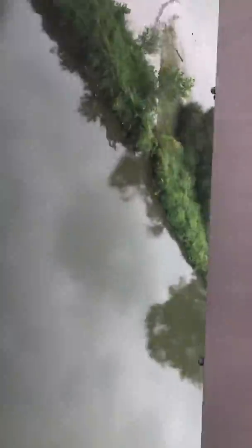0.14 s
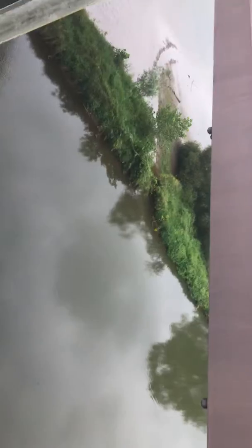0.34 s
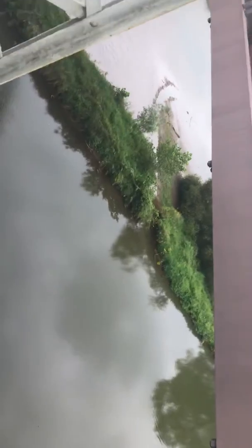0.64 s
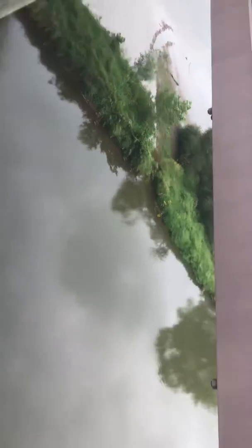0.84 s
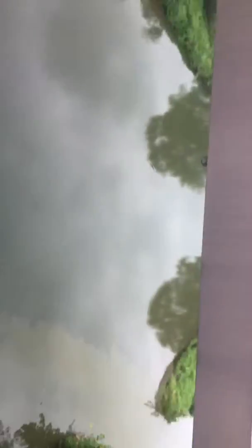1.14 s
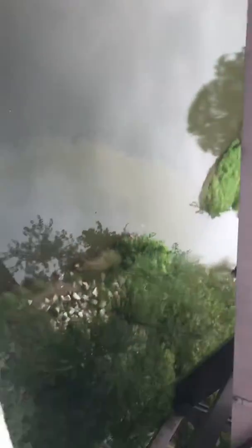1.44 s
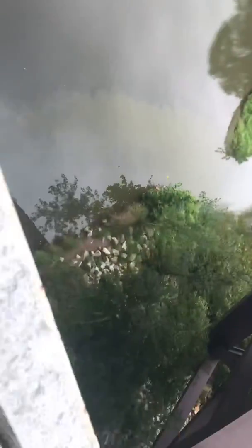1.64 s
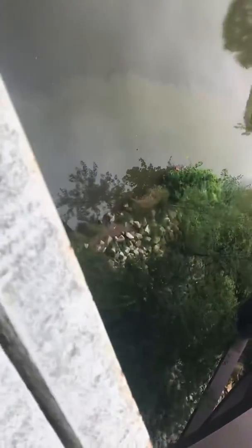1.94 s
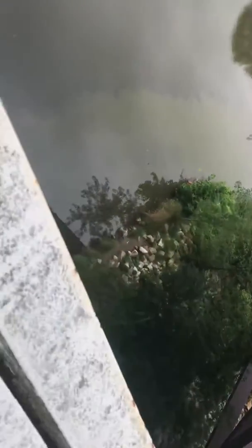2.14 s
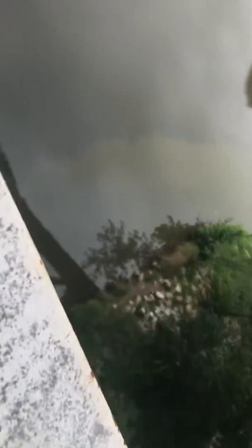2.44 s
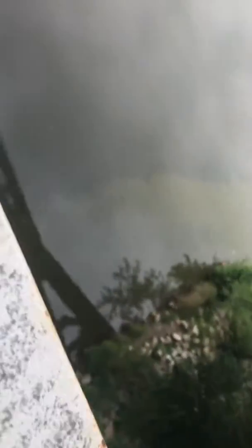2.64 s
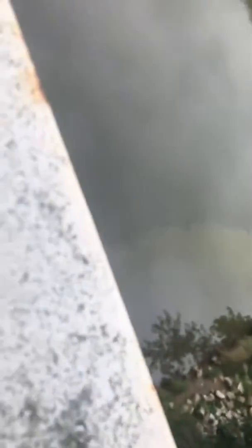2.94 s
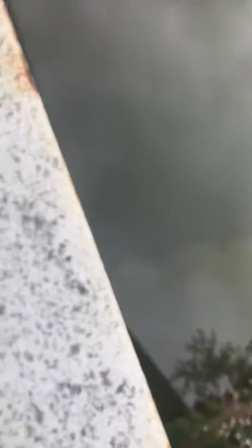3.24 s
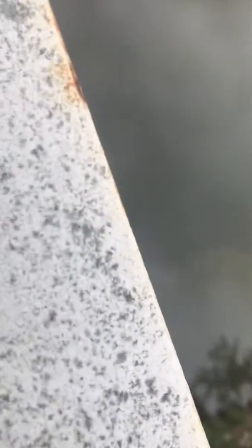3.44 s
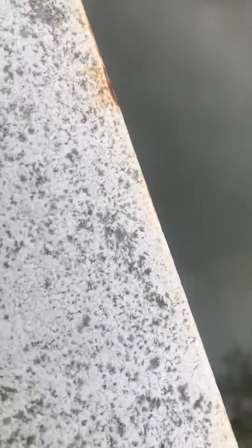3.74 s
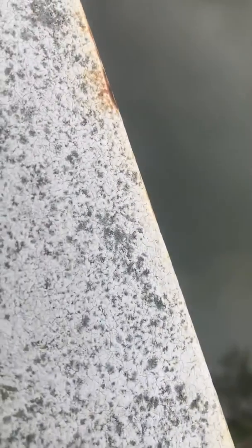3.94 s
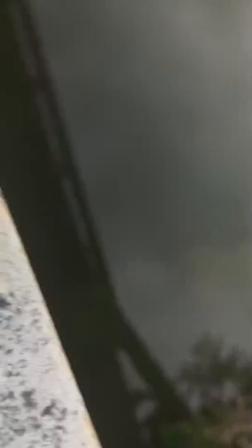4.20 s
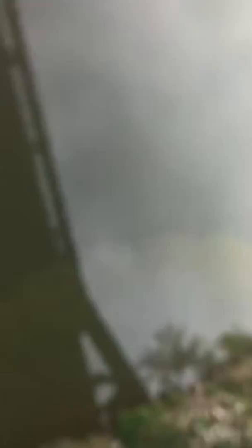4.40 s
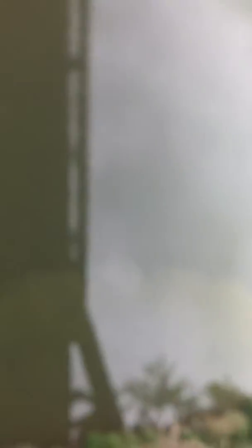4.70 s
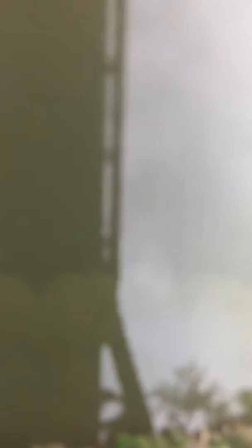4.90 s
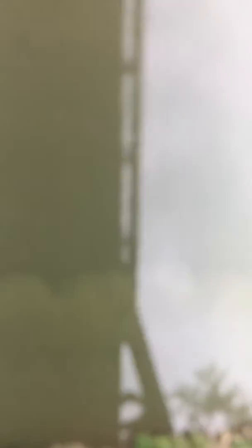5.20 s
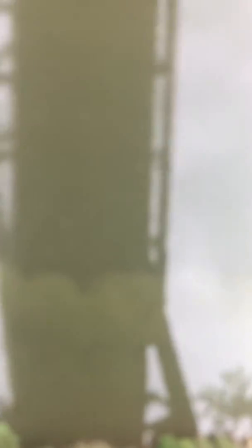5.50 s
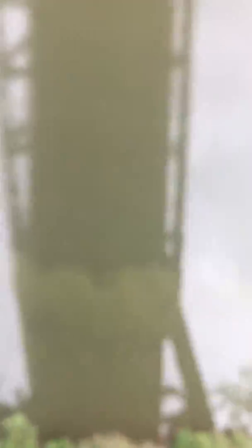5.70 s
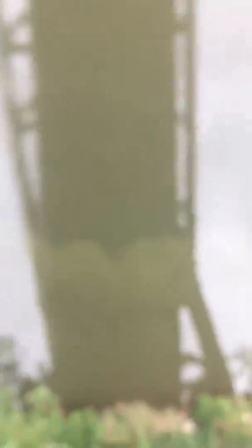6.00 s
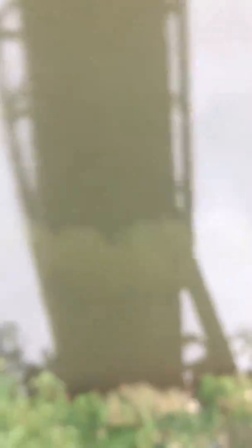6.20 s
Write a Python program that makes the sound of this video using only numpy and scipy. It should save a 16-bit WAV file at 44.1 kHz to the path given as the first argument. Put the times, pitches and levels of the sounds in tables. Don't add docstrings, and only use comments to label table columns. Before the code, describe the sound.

Steady hollow tyre roar of cars crossing a steel river bridge, singing and rumbling, with one loud click midway and the traffic gradually thinning.

```python
import sys
import numpy as np
from scipy import signal
from scipy.io import wavfile
from scipy.ndimage import uniform_filter1d

SR = 44100
rng = np.random.default_rng(int(sys.argv[2]) if len(sys.argv) > 2 else 0)


def ratio(d):
    e = np.asarray(d, float) / 20
    return 10 ** e


def transcribe(signal):
    frames = np.atleast_2d(signal).T
    limited = np.clip(frames, -1, 1)
    pcm = np.round(limited * 32767).astype(np.int16)
    wavfile.write(sys.argv[1], SR, pcm)


N = 280035

# t/s, tyre roar level/dB
TRAFFIC = [(0, -30.5), (.12, -29.5), (.55, -32), (.75, -29), (1.0, -30.5), (1.6, -30.5), (2.05, -30),
           (2.4, -31), (2.5, -32.5), (3.25, -31.5), (3.82, -33), (3.92, -33), (4.75, -35.5), (5.1, -36),
           (5.8, -40), (5.89, -34.5), (6.24, -36.5), (6.35, -32.5)]
# t/s, distance between comb teeth f/Hz
GIRDERS = [(0, 336.3), (1.3, 333.3), (2.1, 330), (2.5, 323.3), (3.0, 318), (3.4, 310.3), (4.0, 305.5),
           (5.2, 304.2), (6.35, 306.5)]
BUSY_DB = -30
TICK_PERIOD, TICK_START = .05, .005


def evened(x):
    return x / np.sqrt(np.mean(x ** 2) + 1e-20)


def read(points, hz):
    f, value = np.transpose(points)
    return np.interp(np.log(hz + 1), np.log(f + 1), value, -120, -120)


def curve(rows, t):
    return np.interp(t, *np.transpose(rows))


def add(mix, s, sound):
    part = mix[round(s * SR):][:len(sound)]
    part += sound[:len(part)]


def bell(t, s, half):
    return 1 / (1 + ((t - s) / half) ** 2) ** 2


def strength(t, law, passes):
    full_db, share, turn_db = law
    steady = ratio(full_db + share * (curve(TRAFFIC, t) - BUSY_DB) - turn_db * t)
    extra = sum(ratio(db) ** 2 * bell(t, s, half) for s, half, db in passes)
    return np.sqrt(steady ** 2 + extra)


def resonate(x, hz, width):
    turn = np.exp(2j * np.pi * np.cumsum(hz * np.ones(len(x))) / SR)
    r = np.exp(-np.pi * width / SR)
    return 2 * (turn * signal.lfilter([1 - r], [1, -r], x / turn)).real


def fuzzy_tone(hz, width):
    tone = rng.standard_normal(N)
    for _ in range(3):
        tone = resonate(tone, hz, width)
    return evened(tone)


def girder_comb(hz, t, combed):
    spacing = curve(GIRDERS, t)
    back = np.clip(combed * (0.18 + 0.01 * (BUSY_DB - curve(TRAFFIC, t))), 0, .9)
    back = back * np.exp(-(hz / 1170) ** 2)
    comb = 1 / abs(1 - back * np.exp(2j * np.pi * hz / spacing))
    near_db, clear_db, clear_s, half_s = -4.5, 2.5, 4, 3.5
    gap_db = near_db + (clear_db - near_db) * bell(t, clear_s, half_s)
    return comb * ratio(np.exp(-((hz / spacing - 1.45) / 0.3) ** 2) * gap_db)


def rush(spectrum, patchy_db, combed):
    hop, size = 256, 1024
    frames, hz = N // hop + 5, np.fft.rfftfreq(size, 1 / SR)[:, None]
    t = np.arange(frames) * hop / SR
    a, b, patches = rng.standard_normal((frames, len(hz), 3)).T
    patches = uniform_filter1d(patches, size=5, axis=0)
    patches = evened(uniform_filter1d(patches, size=30, axis=1))
    shape = ratio(read(spectrum, hz)) * girder_comb(hz, t, combed)
    shape = shape / np.sqrt((shape ** 2).mean(0)) * ratio(patchy_db * patches)
    return evened(signal.istft((a + 1j * b) * shape, nperseg=size, noverlap=size - hop)[1][:N])


def tyre_roar(t):
    # f/Hz, level/dB
    roar = [(380, -39.5), (450, -14), (550, -7), (700, -6), (900, -1.5), (1150, -1), (1400, 0), (1650, -2),
            (1850, -5.5), (2050, -17), (2400, -32), (3000, -63.5)]
    return ratio(curve(TRAFFIC, t) - 0.62) * rush(roar, patchy_db=1.59, combed=0.52)


def tyre_sizzle(t):
    # f/Hz, level/dB
    sizzle = [(1700, -18), (2050, -2.5), (2400, -7.5), (2800, -14.5), (3200, -20.5), (3700, -25),
              (4200, -35), (5000, -41)]
    # t/s, half length/s, level/dB
    near_cars = [(.03, 0.31, -51), (1.001, .15, -47), (1.35, .15, -51.5), (2.3, 0.17, -56.5),
                 (4.5, 0.28, -56), (5.1, .2, -52), (5.602, .2, -54.5)]
    return strength(t, (-45.5, 0.26, 1.32), near_cars) * rush(sizzle, patchy_db=1.5, combed=0)


def deck_rumble(t):
    # f/Hz, level/dB
    rumble = [(110, -32.5), (160, 0.5), (220, -1.5), (320, -2.5), (400, -8), (470, -8.5), (600, -40.5)]
    # t/s, half length/s, level/dB
    deck_loads = [(.88, .1, -45), (1.35, .2, -48.5), (2.85, 0.46, -41), (3.7, 0.36, -41), (4.35, 0.42, -44),
                  (5.1, .15, -46), (5.906, 0.12, -47)]
    return strength(t, (-41.5, 0.73, 0.51), deck_loads) * rush(rumble, patchy_db=2.0, combed=0.76)


def engine_boom(t):
    # f/Hz, level/dB
    boom = [(18, -30), (30, -12.5), (45, 1), (60, 2.5), (90, 3), (130, -3), (170, -12), (240, -26.5)]
    # t/s, half length/s, level/dB
    lorries = [(0.127, 0.091, -46.5), (0.758, 0.042, -38.5), (0.937, 0.086, -36.5), (1.651, .2, -45.5),
               (2.302, .1, -42.5), (2.58, 0.11, -38), (3.0, .1, -43), (4.4, .15, -44), (4.85, .3, -46.5),
               (5.36, 0.046, -44)]
    return strength(t, (-45.5, 0.28, 0.16), lorries) * rush(boom, patchy_db=0.75, combed=0)


def tread_song(t):
    # t/s, half length/s, level/dB
    songs = [(0.29, .3, -34.5), (.85, 0.24, -37), (1.296, 0.13, -37.5), (2.0, .1, -39), (2.653, .15, -37),
             (3.153, .3, -35.5), (3.8, 0.18, -40.5), (4.35, .15, -44.5), (4.85, .2, -45), (5.35, .3, -44),
             (5.917, .08, -43)]
    return strength(t, (-46.5, .8, .1), songs) * fuzzy_tone(3 * curve(GIRDERS, t), width=100)


def tread_hum(t):
    # t/s, half length/s, level/dB
    hums = [(.6, .3, -43.5), (1.3, 0.22, -47), (2.4, 0.5, -42.5), (2.85, .15, -42), (3.805, 0.18, -45),
            (4.4, .3, -49.5)]
    hz = 2 * curve(GIRDERS, t) + 35 * bell(t, .85, .3)
    return strength(t, (-47.5, .9, .1), hums) * fuzzy_tone(hz, width=79)


def air_flutter():
    span = round(.08 * SR)
    waver = uniform_filter1d(uniform_filter1d(rng.standard_normal(N), span), span)
    return ratio(.6 * evened(waver))


def hiss(t):
    # f/Hz, level/dB
    hiss_spectrum = [(3000, -5), (3600, -4.5), (4300, -7.5), (5000, -14.5), (5500, -6), (5900, -1.5),
                     (6400, -10), (7000, -13.5), (7600, -17.5), (9400, -19), (10400, -23.5), (11500, -21.5),
                     (15000, -22), (16500, -21)]
    # t/s, half length/s, level/dB
    extra_hiss = [
        (4.2, .4, -68),
        (.1, .3, -72),
    ]
    return strength(t, (-65.5, 0, 0), extra_hiss) * rush(hiss_spectrum, patchy_db=1.0, combed=0)


def circuit_whine(t):
    # f/Hz, level/dB
    whine = [(8200, -100), (13400, -105), (14000, -101), (15600, -104)]
    return sum(ratio(db + 3) * np.sin(2 * np.pi * hz * t) for hz, db in whine)


def snaps():
    # t/s, level/dB
    taps = [
        (.003, -55.5),
        (1.5491, -47),
        (2.455, -60),
        (3.2943, -23.5),
        (3.8556, -52.5),
        (5.948, -51),
    ]
    # f/Hz, level/dB, time to fall 60 dB/s
    case = [(1980, 9, 0.013), (2570, 3.5, 0.014), (3234, -1, 0.011), (3730, -1, 0.011),
            (4530, -7.5, 0.0089), (5620, -7.5, 0.0086), (6850, -4.5, 0.0074), (7480, -7, 0.0049),
            (8600, -6, 0.0035), (9300, -6, 0.0067), (11200, -8, .003), (12400, -8, .003),
            (14200, -13, .002)]
    t, out = np.arange(1500) / SR, np.zeros(N)
    ring = np.zeros(len(t))
    for hz, db, t60 in case:
        wave = np.sin(2 * np.pi * (hz * t + rng.random()))
        soft_start = np.minimum(t * hz / 5.3, 1)
        ring += ratio(db - 60 * t / t60) * wave * soft_start
    ring = ring / abs(ring).max()
    echo = resonate(resonate(ring, 3100, width=3300), 3100, width=3300)
    rattle = resonate(rng.standard_normal(len(t)), 6700, width=5200)
    rattle = ratio(-16 - 60 * t / 0.035) * resonate(rattle, 6700, width=5200)
    for s, db in taps:
        add(out, s, ratio(db) * (ring + rattle))
        add(out, s + .003, ratio(db - 8) * echo)
    return out


def click(modes):
    t = np.arange(300) / SR
    ring = sum(ratio(db) * np.exp(-np.pi * width * t) * np.sin(2 * np.pi * hz * t) for hz, width, db in modes)
    ring = ring * np.minimum(t / .0003, 1)
    return ring / abs(ring).max()


def lens_ticks():
    # f/Hz, width/Hz, level/dB
    tick = [(7170, 1200, -4), (8700, 1700, -2), (13000, 2900, -3)]
    late, size = rng.random((round(N / SR / TICK_PERIOD), 2)).T
    at = (np.arange(len(late)) * TICK_PERIOD + TICK_START + .004 * late ** 2) * SR
    ticks = np.zeros(N)
    ticks[at[at < N].astype(int)] = ratio(-58 + 8.3 * size[at < N])
    stray_db = -66 + 3.5 * np.minimum(rng.exponential(1, N), 3)
    ticks += ratio(stray_db) * (rng.random(N) < 40 / SR)
    return signal.oaconvolve(ticks, click(tick))[:N]


def zoom_gain(t):
    start_s, top_db, idle_db = 3.88, -55, -85
    rise_db, fall_db = 300, 11
    down_db = np.maximum(rise_db * (start_s - t), fall_db * (t - start_s))
    return ratio(np.maximum(top_db - down_db, idle_db))


def zoom_steps():
    # f/Hz, width/Hz, level/dB
    step_ring = [(5700, 980, -8), (8200, 1800, -6), (14300, 2500, -6.5)]
    fast = np.arange(0, N / SR - TICK_PERIOD, TICK_PERIOD / 10) + TICK_START
    fast = (fast * SR).astype(int)
    steps = np.zeros(N)
    steps[fast] = zoom_gain(fast / SR) * rng.uniform(.35, 1.35, len(fast))
    return signal.oaconvolve(steps, click(step_ring))[:N]


def far_engines(t):
    # t/s, half length/s, level/dB, f/Hz
    drones = [(.3, 0.36, -46.5, 189), (0.947, .2, -46.5, 244), (1.75, 0.49, -44.5, 226),
              (3.0, .35, -45, 287), (3.6, .3, -46, 295), (4.3, .4, -47.5, 310.5), (5.0, 0.52, -49, 278),
              (5.65, .3, -48.5, 283.5), (6.1, 0.32, -50, 323)]
    return sum(ratio(db) * bell(t, s, half) * fuzzy_tone(hz, width=61) for s, half, db, hz in drones)


def insect(t):
    # t/s, length/s, f/Hz, level/dB
    peeps = [
        (0.703, .05, 8950, -81),
        (.90, 0.06, 8700, -81),
        (.92, .07, 9600, -83),
        (6.045, .17, 9600, -84),
    ]
    out = np.zeros(N)
    for s, length, hz, db in peeps:
        count = round(length * SR)
        add(out, s, ratio(db) * np.sin(2 * np.pi * hz * t[:count]) * signal.windows.tukey(count, .4))
    return out


def thumps():
    # t/s, level/dB, f/Hz, length/s
    knocks = [
        (0.867, -29, 240, 0.023),
        (4.369, -28.5, 337, 0.0082),
        (4.5222, -23, 130, 0.0034),
        (5.335, -30.5, 420, 0.009),
        (5.356, -27, 233, 0.014),
        (5.385, -36, 270, 0.0096),
        (6.3, -30, 271, 0.0091),
    ]
    out = np.zeros(N)
    for s, db, hz, length in knocks:
        t = np.arange(round(abs(length) * SR) + 2) / SR
        add(out, s, ratio(db) * np.sin(2 * np.pi * hz * t) * np.hanning(len(t)))
    return out


def tyre_whistle(t):
    # t/s, half length/s, level/dB
    whistles = [
        (5.05, 0.28, -43),
        (6.3, .3, -48),
    ]
    gain = sum(ratio(db) * bell(t, s, half) for s, half, db in whistles)
    return gain * fuzzy_tone(1590, width=52)


def scene():
    t = np.arange(N) / SR
    traffic = tyre_roar(t) + tyre_sizzle(t) + deck_rumble(t) + engine_boom(t)
    traffic += tread_song(t) + tread_hum(t) + far_engines(t) + tyre_whistle(t)
    camera = hiss(t) + circuit_whine(t) + snaps() + lens_ticks() + zoom_steps()
    return (traffic * air_flutter() + camera + insect(t) + thumps())[None]


def band_limit(x):
    return signal.sosfilt(signal.butter(12, 15790, fs=SR, output="sos"), x)


def record(dry):
    low_cut = signal.butter(4, 40.3, "high", fs=SR, output="sos")
    closing = np.minimum(np.arange(N)[::-1] / 60, 1)
    return band_limit(signal.sosfilt(low_cut, dry) * closing)


dry = scene()
out = record(dry)
transcribe(out)
```